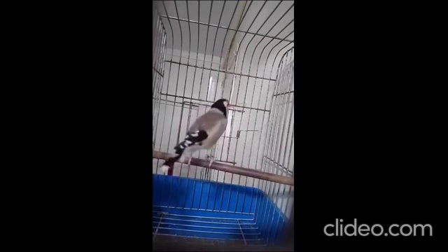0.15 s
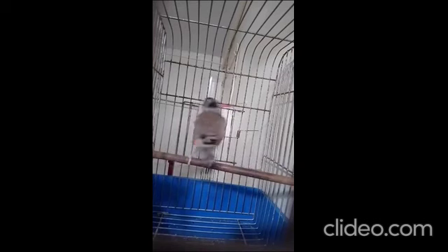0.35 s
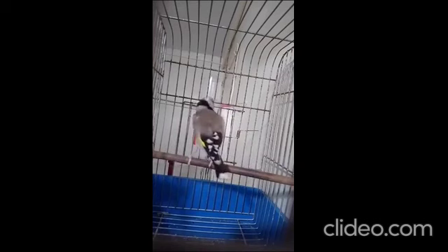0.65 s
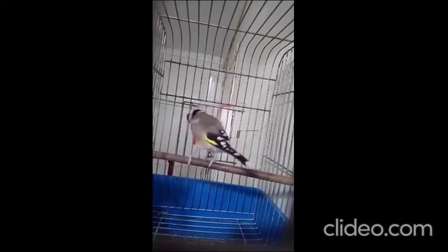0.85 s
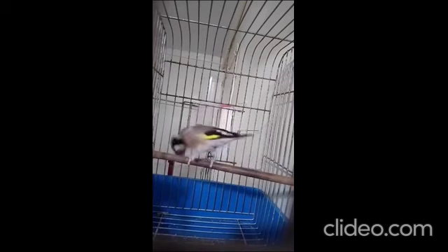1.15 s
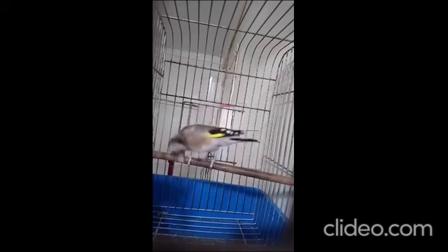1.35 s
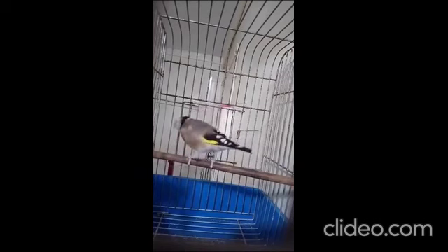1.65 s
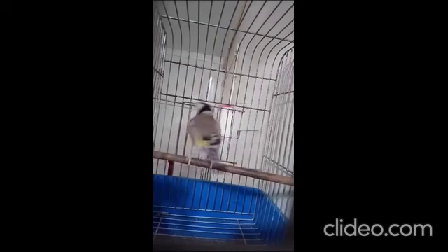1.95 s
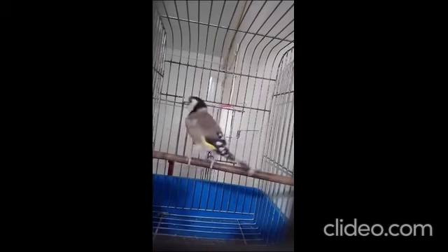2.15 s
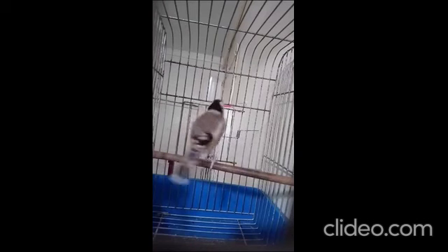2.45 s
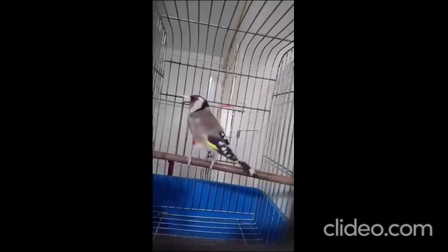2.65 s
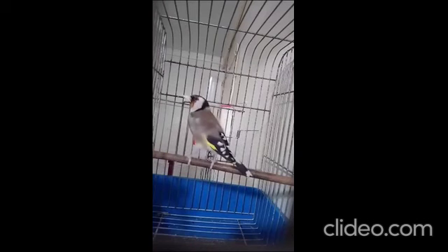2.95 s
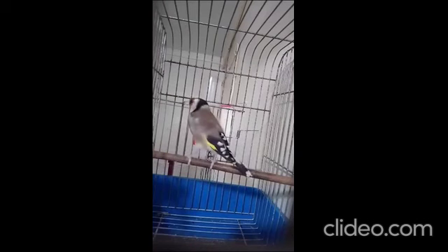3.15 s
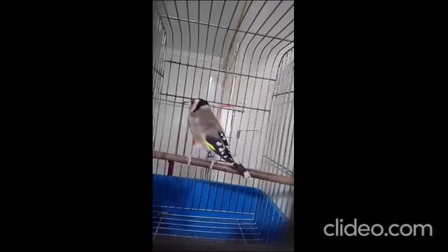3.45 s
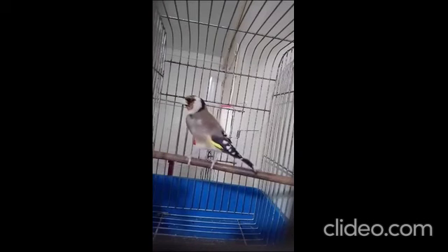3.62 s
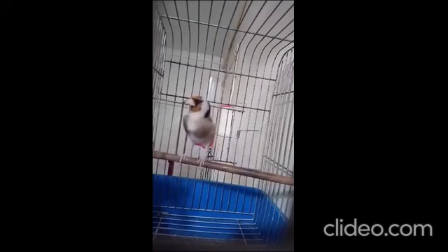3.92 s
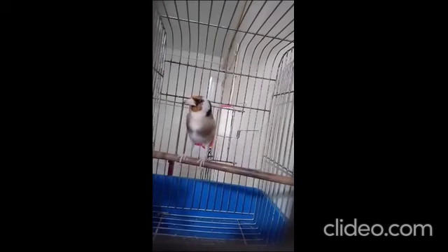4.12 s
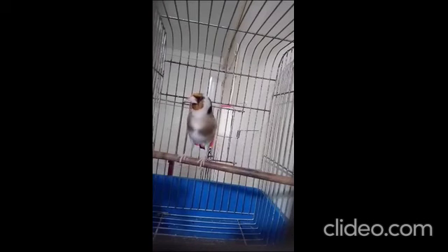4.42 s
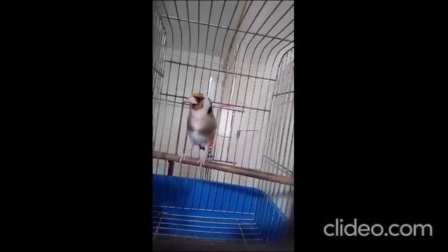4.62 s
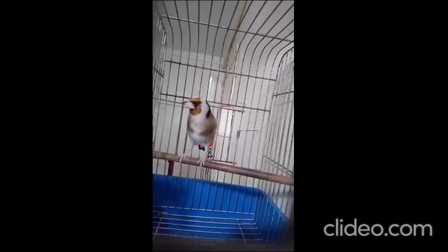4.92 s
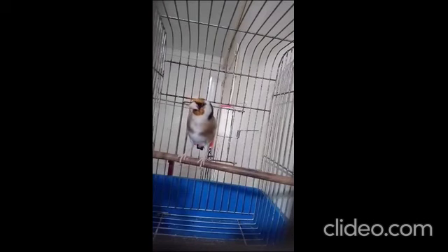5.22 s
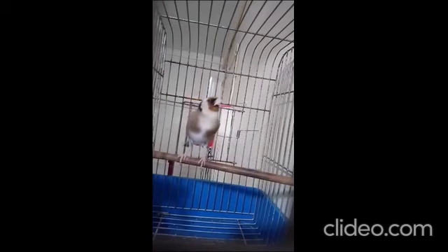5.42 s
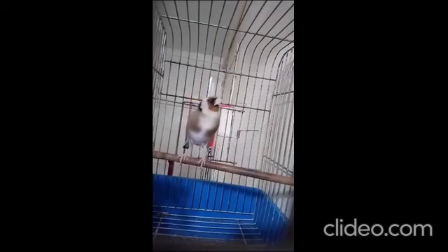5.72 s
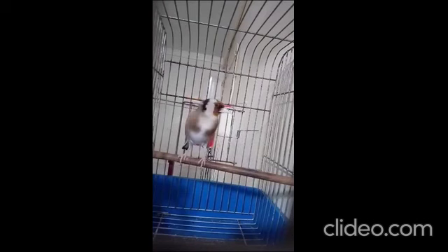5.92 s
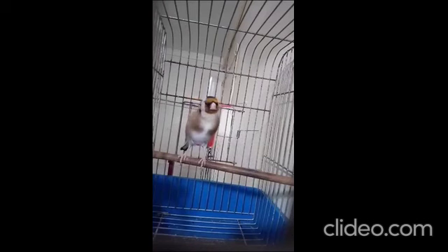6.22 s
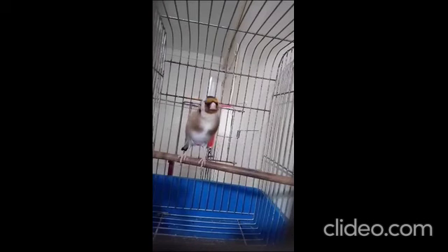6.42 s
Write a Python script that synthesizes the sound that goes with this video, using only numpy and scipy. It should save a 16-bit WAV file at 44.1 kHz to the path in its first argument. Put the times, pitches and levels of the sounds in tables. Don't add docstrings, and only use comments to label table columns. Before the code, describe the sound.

A phone-like microphone near a small caged songbird picks up soft taps on wood, wire and plastic, dry feather rustles and a low wavering hum. About two seconds in comes a piercing half-second burst of clicks, rising sweeps and level whistle, ringing off hard walls. Distant birds answer with rapid blurred chips and thin whistles, which fade before a few last claw knocks.

```python
import sys
import numpy as np
from scipy import signal
from scipy.fft import rfft, irfft, next_fast_len
from scipy.io import wavfile
from scipy.ndimage import uniform_filter1d

SR = 44100
rng = np.random.default_rng(int(sys.argv[2]) if len(sys.argv) > 2 else 0)


def inscribe(sig):
    pcm = np.round(np.clip(np.atleast_2d(sig).T, -1, 1) * 32767)
    wavfile.write(sys.argv[1], SR, pcm.astype(np.int16))


def natural_amplitude(level_db):
    exponent = np.asarray(level_db, float) / 20
    return 10 ** exponent


N = 289737
T = np.arange(N) / SR
LEAD = SR
FAST = next_fast_len(N)
FRAME = 2048

# (time [s], pitch [Hz], level [dB])
LOW_VOICE = [
    [(1.9280, 3900, -30.5), (1.9310, 3643, -15.5), (1.9345, 3520, -33)],
    [(2.035, 1887, -46), (2.066, 2260, -46.5), (2.082, 2455, -21), (2.091, 2573, -26), (2.095, 2544, -14),
     (2.104, 2675, -25.5), (2.113, 2744, -29.5), (2.140, 3000, -31), (2.165, 3213, -21.5),
     (2.186, 3492, -19.5), (2.194, 3357, -34)],
    [(2.460, 2724, -47), (2.475, 2336, -30), (2.490, 2099, -31.5), (2.499, 2010, -49)],
]
# (time [s], pitch [Hz], level [dB])
HIGH_VOICE = [
    [(1.9235, 5760, -36.5), (1.9255, 5007, -22), (1.9278, 3850, -18), (1.9292, 3000, -43.5)],
    [(1.9295, 4140, -16.5), (1.9320, 4413, -17), (1.9378, 5004, -15), (1.9400, 4876, -21)],
    [(2.135, 3532, -30), (2.15, 3800, -28), (2.163, 4022, -18.5), (2.176, 4330, -26.5),
     (2.192, 4673, -27.5)],
    [(2.228, 3813, -25.5), (2.236, 4370, -12.5), (2.242, 4402, -12), (2.247, 4550, -16.5),
     (2.251, 4640, -29.5)],
    [(2.262, 4228, -31), (2.280, 3950, -24.5), (2.298, 3674, -20), (2.308, 3624, -8), (2.313, 3515, -25.5)],
    [(2.313, 3575, -26), (2.324, 3518, -9.5), (2.350, 3491, -14), (2.358, 3505, -27.5), (2.385, 3494, -26),
     (2.414, 3510, -21), (2.424, 3553, -34.5), (2.472, 3504, -47)],
    [(2.474, 3360, -36), (2.486, 3510, -23), (2.492, 3286, -26.5), (2.503, 3060, -11), (2.512, 2660, -18.5),
     (2.522, 2410, -20.5)],
]
# (peak time [s], level [dB], rise [s], fall [s])
LOW_OCTAVE = [
    (2.15, -42, 0.014, .04),
    (2.489, -24, 0.0087, 0.0039),
]
HIGH_OCTAVE = [
    (2.142, -48, .01, 0.014),
    (2.372, -32.5, .012, 0.034),
    (2.41, -36, 0.024, 0.008),
    (2.455, -38, .03, 0.0024),
]
# (peak time [s], level [dB], rise [s], fall [s])
SUM_TONE = [
    (2.153, -40, 0.013, 0.016),
    (2.472, -40, 0.0059, 0.0052),
    (2.49, -37, 0.0144, 0.024),
]
DIFFERENCE_TONE = [
    (2.165, -41.5, .02, 0.032),
]
# (delay [s], level [dB])
REFLECTIONS = [(.0042, -10.5), (.0115, -9.5), (.0212, -15), (.0285, -13.5), (.033, -15)]

# (time [s], top pitch [Hz], level [dB])
CHIPS = [(.41, 4100, -51), (.46, 4230, -49), (.51, 3900, -48), (.56, 4200, -48.5), (.62, 4000, -49.5),
         (.68, 4100, -59), (.968, 3000, -50.5), (1.12, 4100, -49.5), (1.84, 4150, -56), (3.07, 3160, -49.5),
         (3.185, 3860, -43.5), (3.27, 3930, -48), (3.54, 4020, -34.5), (3.591, 4556, -31.5),
         (3.644, 4400, -36), (3.75, 3610, -47.5), (3.762, 2850, -49), (3.974, 4400, -43.5),
         (4.03, 4170, -45.5), (4.082, 4670, -41), (4.13, 4260, -44), (4.18, 4540, -42.5), (4.23, 4400, -44),
         (4.295, 3600, -38.5), (4.315, 4070, -40), (4.36, 3710, -45), (4.42, 5380, -44), (4.578, 4490, -34),
         (4.64, 4500, -36), (4.751, 4950, -40.5), (4.855, 4510, -33), (4.921, 4450, -39),
         (4.98, 4410, -41.5), (5.48, 3210, -55), (5.68, 2930, -61)]
# (time [s], length [s], middle pitch [Hz], glide
# [Hz], level [dB])
WHISTLES = [(-.07, 0.037, 5750, -480, -44.5), (-.05, 0.027, 4464, -500, -32.5),
            (3.315, 0.045, 6080, -40, -55), (3.38, .06, 5930, -30, -59), (3.422, 0.051, 5330, -400, -46),
            (3.426, 0.037, 4495, -400, -44), (3.665, 0.059, 6440, 334, -52.5),
            (3.688, 0.065, 5500, 102, -56), (3.79, 0.049, 4770, 395, -36), (3.82, 0.05, 4940, 354, -39.5),
            (3.9, 0.06, 4884, 300, -42.5), (3.955, 0.019, 5990, 40, -47), (4.03, 0.035, 6020, -51, -51),
            (4.085, 0.016, 6000, -40, -47), (4.13, 0.05, 5970, -63, -53), (4.19, 0.028, 5970, 40, -52),
            (4.23, 0.018, 5970, -45, -53.5), (4.27, 0.016, 6100, 30, -58), (4.39, 0.042, 6400, 1009, -55),
            (4.42, 0.022, 3050, 987, -46), (4.49, 0.016, 3040, 1103, -43.5), (4.73, 0.02, 2830, 905, -46.5),
            (4.52, 0.064, 5135, -44, -45.5), (4.58, 0.077, 5120, -27, -50), (4.68, 0.052, 6420, 1104, -57),
            (4.80, 0.064, 5120, -40, -45.5), (4.86, 0.083, 5110, -34, -53), (6.508, .057, 4800, 305, -54.5)]
# (time [s], highest pitch [Hz], level [dB])
FLOCK = [(0.296, 3630, -58), (0.498, 4030, -62), (.8, 3827, -57), (1.6, 3534, -64.5), (1.879, 4090, -52.5),
         (3.0, 3380, -64), (3.5, 4004, -52.5), (4.0, 4796, -52.5), (4.25, 4837, -46.5), (4.5, 4740, -51),
         (4.9, 4654, -48.5), (5.1, 4316, -59), (5.8, 3033, -62.5), (6.1, 3270, -55.5), (6.4, 3000, -66.5)]

# (time [s], peak level [dB], tray thud [dB], perch tap [dB])
KNOCKS = [(0.9761, -36.5, -17, -16), (1.1207, -33.5, -25, -15.5), (1.161, -38, -15, -20),
          (1.2279, -34, -9.5, -15), (1.3214, -30.5, -34, -16), (1.336, -37.5, -12, -15.5),
          (1.357, -56, -22, -9), (3.7748, -34, -7, -13), (3.7969, -51, -3, -22), (5.981, -44.5, -12, -1.5),
          (6.5194, -46.5, -9, 0), (6.5439, -44, -6.5, 7.5)]
# (frequency [Hz], width [Hz], level [dB])
WIRES = [(1331, 150, -0.5), (1490, 100, -7), (1720, 76, -5), (2200, 55, -17), (2620, 170, -6),
         (3000, 150, -13)]
PERCH = [(632, 9.8, 0), (819, 54, -6)]
TRAY = [(287, 30, 12), (344, 33, 8), (400, 35, -24)]
# (peak time [s], level [dB], rise [s], fall [s])
CREAK = [
    (1.06, -41.5, 0.13, 0.076),
    (1.24, -43.5, 0.033, 0.065),
    (1.315, -49, .05, 0.01),
    (1.4, -52, 0.022, 0.031),
    (3.78, -41, 0.05, 0.1),
    (3.89, -48, 0.12, 0.041),
]

# (peak time [s], level [dB], rise [s], fall [s])
RUSTLE = [(0, -65, .1, 0.13), (.64, -77.5, 0.19, 0.12), (.98, -75, 0.041, 0.14), (1.08, -70.5, 0.12, 0.43),
          (1.335, -63, 0.015, 0.017), (1.53, -76, 0.049, 0.16), (1.78, -80.5, 0.12, .3),
          (1.93, -65.5, 0.0046, 0.36), (2.16, -58.5, 0.035, 0.061), (2.55, -69, 0.043, 0.11),
          (2.74, -74, 0.16, 0.19), (3.06, -67.5, 0.093, 0.26), (3.43, -70, 0.068, 0.46),
          (3.69, -65, 0.043, 0.18), (4.01, -74, 0.18, 0.27), (4.21, -60, 0.093, 0.13),
          (4.41, -66, 0.068, .13), (4.73, -67.5, .12, 0.15), (4.89, -70.5, .04, 0.18),
          (5.42, -73, 0.14, 0.24), (5.62, -67.5, 0.19, 0.22), (5.99, -57, 0.016, 0.097),
          (6.18, -63, 0.038, 0.13), (6.515, -59.5, 0.014, 0.12)]
# (frequency [Hz], density [dB per Hz])
FEATHER = [(1000, -26), (1400, -7), (2400, -3), (3600, -7.5), (5500, -14.5), (7500, -17), (9500, -16.5),
           (10400, -23), (10800, -49.5)]
FEATHER_TOP = [(10300, -13.5), (10500, 2.0), (12000, 1.5), (13900, -7.5), (14200, -27.0)]

# (frequency [Hz], density [dB per Hz])
AIR = [(260, -42.5), (450, -9.5), (527, 0.5), (776, -7), (896, 0), (1100, -5), (1460, 1.5), (1890, -1),
       (3930, -19.5), (4540, -14), (6140, -31), (8790, -38.5), (11500, -45.5), (12500, -49.5),
       (13900, -53.5)]
RUMBLE = [(15, -56.5), (30, -25.5), (44, -19), (62, -0.5), (86, -2.5), (157, -13), (298, 3), (450, -5.5),
          (580, -44), (990, -120)]
AIR_EDGES_HZ = [20, 110, 200, 300, 450, 700, 1100, 1600, 2400, 4000, 14000]
# (time [s], pitch [Hz])
HUM_PITCH = [(0, 77.4), (.3, 79.8), (.9, 84.6), (1.05, 73.5), (1.7, 88), (2.55, 90), (3.1, 103), (3.9, 110),
             (4.6, 116), (5.1, 63.7), (5.55, 71), (5.9, 76.7), (6.2, 65.2), (6.5, 84)]
# (peak time [s], level [dB], rise [s], fall [s])
HUM = [(.18, -60, 0.1, 0.54), (1.0, -57.5, 0.3, 0.073), (1.25, -64, 0.092, 0.14), (1.6, -62, 0.2, 0.45),
       (2.56, -57.5, 0.09, 0.18), (3.15, -65.5, 0.2, .15), (3.9, -68, 0.15, .15), (5.56, -56.5, 0.42, 1.0),
       (6.57, -55.5, 0.1, .1)]
# (peak time [s], level [dB], rise [s], fall [s])
GROWL = [
    (4.72, -64, 0.054, 0.3),
    (5.07, -58, 0.04, 0.23),
]
DRONE = [
    (4.95, -62, 0.48, 0.091),
    (5.38, -53, 0.12, 0.06),
    (5.75, -60, 0.27, 0.52),
]

TONE_HZ = [10164, 10853, 11542, 12575]
# (time [s], length [s], level [dB])
TREBLE_TONES = [
    [(0, 0.2, -86), (2.489, 0.024, -60), (2.51, 0.21, -86)],
    [(0, .12, -76), (.12, 0.23, -95), (2.15, 0.041, -56.5), (2.19, 0.11, -72), (2.325, 0.15, -61.5)],
    [(1.927, 0.05, -77), (1.982, .135, -93), (2.118, 0.073, -81), (2.235, .095, -83), (2.47, .04, -69)],
    [(1.927, 0.015, -65), (1.947, .196, -90), (2.143, .02, -66), (2.163, 0.17, -77), (2.33, .055, -82.5),
     (3.77, 0.67, -94.5)],
]
# (peak time [s], level [dB], rise [s], fall [s])
FILL = [
    (1.935, -64, 0.0032, .1),
    (2.04, -69, 0.085, .006),
    (2.15, -62.5, .006, .15),
    (2.32, -65.5, 0.12, .02),
    (2.49, -67, 0.014, 0.037),
]
# (time [s], length [s], low edge [Hz], high edge [Hz], level [dB])
GAPS = [(1.945, .08, 6100, 7000, -18), (1.95, .09, 13600, 14300, -15), (2.05, .07, 8000, 10000, -16),
        (2.15, .06, 11000, 12300, -14), (2.25, .08, 13200, 14300, -12), (2.33, .135, 11100, 14300, -16),
        (2.34, .11, 5350, 5900, -15), (2.385, .075, 7600, 10400, -16), (2.53, .16, 12200, 12900, -8),
        (3.58, .08, 12300, 14300, -8), (3.8, .14, 11900, 14300, -8), (3.86, .05, 10400, 14300, -12),
        (4.52, .07, 10400, 14300, -8), (4.94, .11, 5550, 6000, -25), (3.77, .12, 6850, 7250, -25),
        (3.87, .04, 5700, 6100, -20), (3.53, .08, 6750, 7100, -22), (3.705, .04, 4750, 5050, -18),
        (4.55, .08, 7150, 7450, -20), (4.76, .1, 7150, 7350, -18)]


def near_bird():
    low, low_gain, low_gate = syrinx_half(LOW_VOICE)
    high, high_gain, high_gate = syrinx_half(HIGH_VOICE)
    rasp = 1 + 0.43 * walk(350)
    low_half = low_gain * np.sin(low) + rasp * low_gate * swell(LOW_OCTAVE) * np.sin(2 * low)
    high_half = high_gain * np.sin(high) + high_gate * swell(HIGH_OCTAVE) * np.sin(2 * high)
    mixing = swell(SUM_TONE) * np.sin(low + high) + swell(DIFFERENCE_TONE) * np.sin(2 * high - low)
    phrase = np.sqrt(2) * (low_half + high_half + rasp * low_gate * high_gate * mixing)
    breath = natural_amplitude(-40) * (low_gain + high_gain) * unit(band(rng.standard_normal(N), 4100, 7600))
    voice = np.r_[np.zeros(LEAD), phrase + breath]
    earlier_s, earlier_db = 2.539, 0.5
    voice = voice + natural_amplitude(earlier_db) * np.roll(voice, -int(earlier_s * SR))
    early = sum(natural_amplitude(db) * np.roll(voice, int(s * SR)) for s, db in REFLECTIONS)
    echo = room(voice, 0.52, 0.55, 0.0023, -7.5, 0.69)
    return (voice + early + natural_amplitude(-3.5) * echo)[None, LEAD:]


def syrinx_half(notes):
    hz, gain, gate = np.zeros((3, N))
    for note in notes:
        s, note_hz, db = np.transpose(note)
        on = (T >= s.min()) & (T < s.max())
        hz[on] = np.interp(T[on], s, note_hz)
        gate[on] = signal.windows.tukey(on.sum(), .15)
        gain[on] = natural_amplitude(np.interp(T[on], s, db)) * gate[on]
    return 2 * np.pi * np.cumsum(hz) / SR, gain, gate


def far_birds():
    voice = np.zeros(LEAD + N)
    warble = 1 + .012 * walk(500)
    chip_s, chip_start = .022, .79
    chips = [(s, chip_s, hz * (1 + chip_start) / 2, hz * (1 - chip_start), db) for s, hz, db in CHIPS]
    for s, length_s, middle_hz, glide_hz, db in [*WHISTLES, *chips, *flock_calls()]:
        u = np.linspace(0, 1, int(length_s * SR))
        hz = (middle_hz + glide_hz * (u - .5)) * warble[int(abs(s) * SR):][:len(u)]
        add_whistle(voice, s, hz, natural_amplitude(db) * np.sin(np.pi * u))
    echo = room(voice, 0.66, 0.5, 0.021, -15, 0.92)
    return (natural_amplitude(-10.5) * voice + natural_amplitude(3.5) * echo)[LEAD:]


def flock_calls():
    chance = rng.random((1500, 4))
    when = chance[:, 0] * 6.5
    s, *columns = np.transpose(FLOCK)
    high_hz, level_db = (np.interp(when, s, c) for c in columns)
    lowest = .68
    centre_hz = high_hz * (lowest + (1 - lowest) * chance[:, 1])
    sweep_hz = 400 + 600 * chance[:, 2]
    level_db = level_db + 8 * (chance[:, 3] - 1.5)
    return np.transpose([when, np.full(len(when), 0.02306), centre_hz, sweep_hz, level_db])


def add_whistle(out, start_s, hz, gain):
    i = LEAD + int(start_s * SR)
    note = np.sqrt(2) * gain * np.sin(2 * np.pi * np.cumsum(hz) / SR)
    out[i:i + len(hz)] += note[:len(out) - i]


def cage():
    tick, tap, thud = np.zeros((3, N))
    grip = np.hanning(700)[250:]
    for s, db, thud_db, tap_db in KNOCKS:
        i = int(s * SR)
        tick[i:i + len(grip)] += natural_amplitude(db) * grip * rng.standard_normal(len(grip))
        tap[i] = natural_amplitude(db + tap_db)
        thud[i] = natural_amplitude(db + thud_db)
    grains = rng.standard_normal(N) * (rng.random(N) < 150 / SR)
    wires = natural_amplitude(9.5) * band(ring(tick, WIRES), 1000, 3600)
    perch = natural_amplitude(42.5) * band(ring(tap, PERCH), 530, 1150)
    creak = natural_amplitude(-9.5) * swell(CREAK) * unit(ring(grains, TRAY))
    tray = band(natural_amplitude(36.0) * ring(thud, TRAY) + creak, 210, 480)
    direct = wires + perch + tray
    return direct + natural_amplitude(2.0) * room(direct, 0.39, 0.21, 0.0084, -14, 1.0)


def feathers():
    body = coloured(FEATHER)
    body = body / np.std(band(body, 7800, 9700))
    top = natural_amplitude(-7) * coloured(FEATHER_TOP)
    flutter = natural_amplitude(1.8 * walk(35) - 4.0)
    return (swell(RUSTLE) + natural_amplitude(-88.5)) * flutter * (body + top)


def air():
    noise = natural_amplitude(-53 - 2.5) * coloured(AIR) + natural_amplitude(-57.5 - 1.84) * coloured(RUMBLE)
    edges = AIR_EDGES_HZ
    return sum(natural_amplitude(1.0 * walk(2.3)) * band(noise, lo, hi) for lo, hi in zip(edges, edges[1:]))


def hum():
    hz = np.interp(T, *np.transpose(HUM_PITCH)) * (1 + 0.04 * walk(14))
    tone = np.sin(2 * np.pi * np.cumsum(hz) / SR)
    return (swell(HUM) + natural_amplitude(-82)) * natural_amplitude(2.8 * walk(15) - 3.5) * tone


def traffic():
    road = rng.standard_normal(N)
    growl = swell(GROWL) * unit(band(road, 118, 138))
    drone = swell(DRONE) * unit(band(road, 195, 255))
    return natural_amplitude(-4.5) * (growl + drone)


def room(x, t60_s, treble_t60_s, build_s, late_db, late_t60_s):
    t = np.arange(SR) / SR
    noise, late = rng.standard_normal((2, SR))
    low = band(noise, 100, 5000)

    def fade(t60):
        return natural_amplitude(-60 * t / t60)

    echo = low * fade(t60_s) + (noise - low) * fade(treble_t60_s) + natural_amplitude(late_db) * late * fade(late_t60_s)
    echo = echo * (1 - np.exp(-t / build_s))
    return signal.fftconvolve(x, echo / np.sqrt(np.sum(echo ** 2)))[:len(x)]


def swell(rows):
    gain = np.zeros(N)
    for s, db, rise_s, fall_s in rows:
        away = np.maximum((s - T) / max(rise_s, .002), (T - s) / max(fall_s, .002))
        gain += natural_amplitude(db - 10 * away)
    return gain


def walk(rate):
    k = int(SR / rate)
    held = np.repeat(rng.standard_normal(N // k + 1), k)
    return 1.295 * uniform_filter1d(uniform_filter1d(held, k), k)[:N]


def ring(x, modes):
    return sum(natural_amplitude(db) * signal.lfilter(*signal.iirpeak(hz, hz / max(width, 5), SR), x)
               for hz, width, db in modes)


def coloured(points):
    hz, db = np.transpose(points)
    f = np.log(np.arange(1, FAST // 2 + 2) * SR / FAST)
    shape = natural_amplitude(np.interp(f, np.log(hz), db, -80, -80))
    return unit(irfft(rfft(rng.standard_normal(FAST)) * shape, FAST)[:N])


def band(x, lo_hz, hi_hz):
    return signal.sosfilt(signal.butter(4, [lo_hz, hi_hz], "band", fs=SR, output="sos"), x)


def unit(x):
    return x / np.sqrt(np.mean(x ** 2))


def scene():
    birds = band(near_bird(), 1000, 7700) + far_birds()
    return birds + cage() + feathers() + air() + hum() + traffic()


def masked(x):
    spec = signal.stft(x[0], nperseg=FRAME, window="cosine")[2][:FRAME // 2]
    bands = spec.reshape(64, 16, -1)
    db = 10 * np.log10(np.mean(abs(bands) ** 2, axis=1) + 1e-18)
    weak = db + 2.5 * rng.standard_normal(db.shape) < .6 * db.max(axis=0) - 63
    weak[:13], weak[23:] = False, False
    gain_db = np.where(weak, -18., 0)
    steps = np.kron(rng.standard_normal((32, db.shape[1])), np.ones((2, 3)))[:, :db.shape[1]]
    gain_db[30:] += 1 * steps[30:]
    gain = natural_amplitude(np.repeat(gain_db, 16, axis=0))
    hz = np.arange(FRAME // 2)[:, None] * SR / FRAME
    s = np.arange(spec.shape[1]) * FRAME / 2 / SR
    for start_s, length_s, low_hz, high_hz, gap_db in GAPS:
        inside = (hz > low_hz) & (hz < high_hz) & (s > start_s) & (s < start_s + length_s)
        gain = gain * np.where(inside, natural_amplitude(gap_db), 1)
    full = np.vstack([spec * gain, 0 * spec[:1]])
    return signal.istft(full, nperseg=FRAME, window="cosine")[1][None, :N]


def shifted_treble(dry):
    squashed = .006 * np.tanh(band(dry, 5400, 6500) / 0.0052)
    source = natural_amplitude(-30) * squashed + natural_amplitude(-43) * band(dry, 2300, 2800)
    return band(2 * source * np.cos(2 * np.pi * 7580 * T), 9800, 14200)


def treble_tones():
    tones = np.zeros(N)
    for hz, rows in zip(TONE_HZ, TREBLE_TONES):
        for s, length_s, db in rows:
            gate = np.clip(np.minimum(T - s, s + length_s - T) / .004, 0, 1)
            tones += natural_amplitude(db) * np.sqrt(2) * np.sin(2 * np.pi * hz * T) * gate
    return tones


def low_pass(x):
    return signal.sosfilt(signal.butter(12, 15720, fs=SR, output="sos"), x)


def record(dry):
    fill = swell(FILL) * unit(band(rng.standard_normal(N), 7900, 10300))
    hiss = natural_amplitude(-99.5) * rng.standard_normal(N)
    mix = masked(dry + shifted_treble(dry) + fill) + treble_tones() + hiss
    return low_pass(mix)


dry = scene()
out = record(dry)
inscribe(out)
```